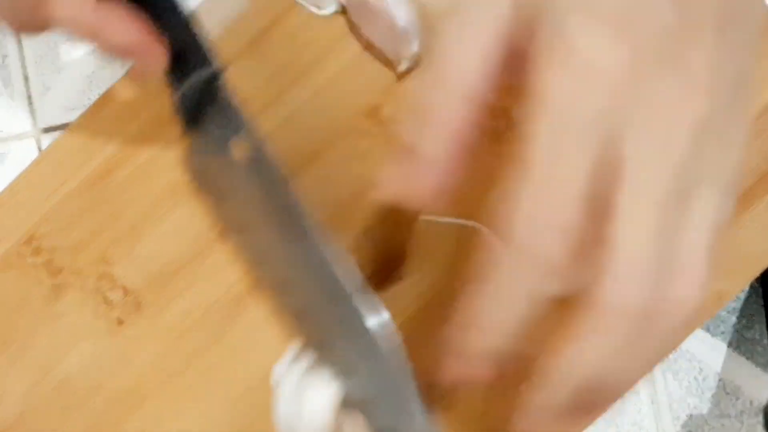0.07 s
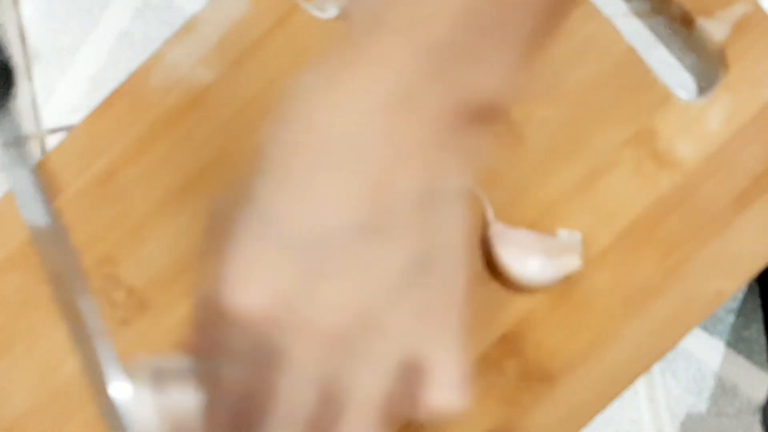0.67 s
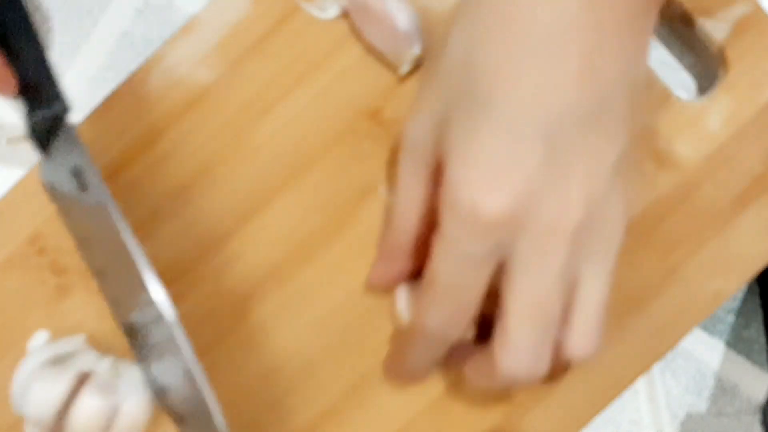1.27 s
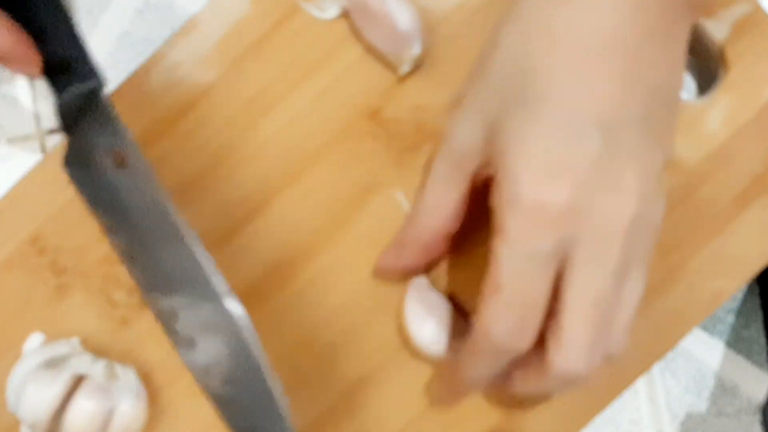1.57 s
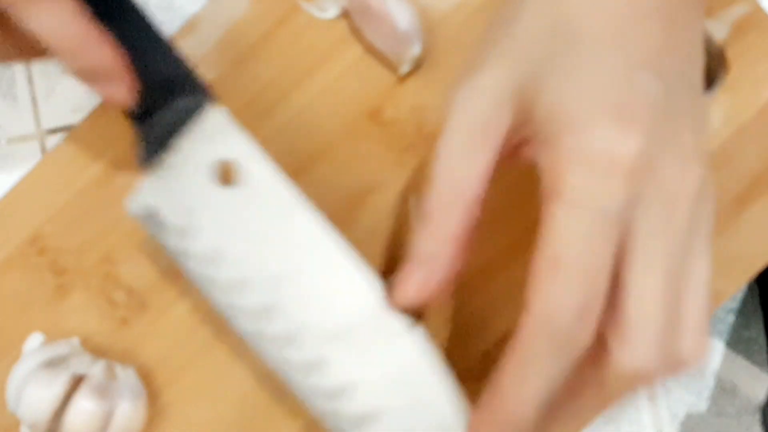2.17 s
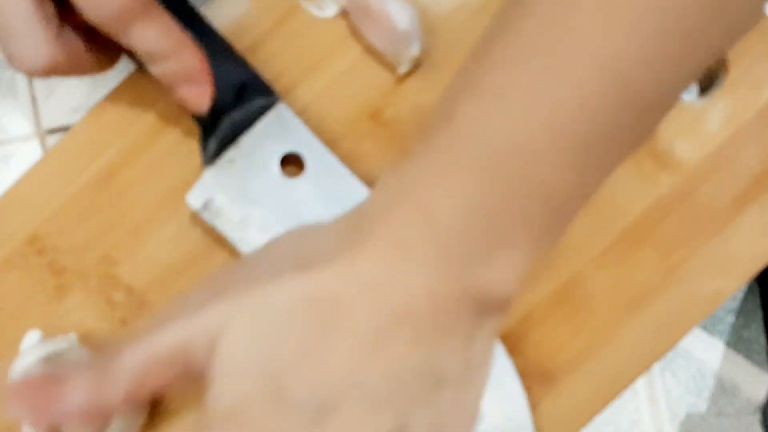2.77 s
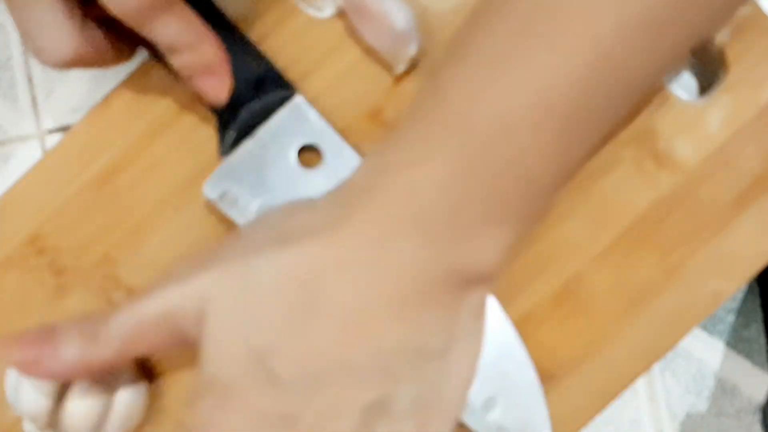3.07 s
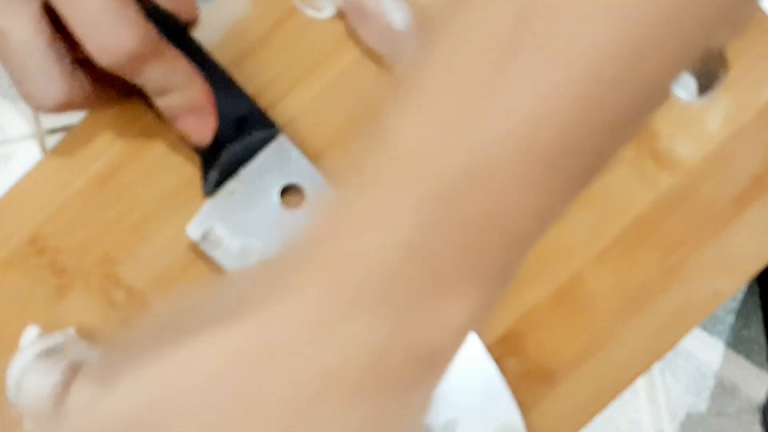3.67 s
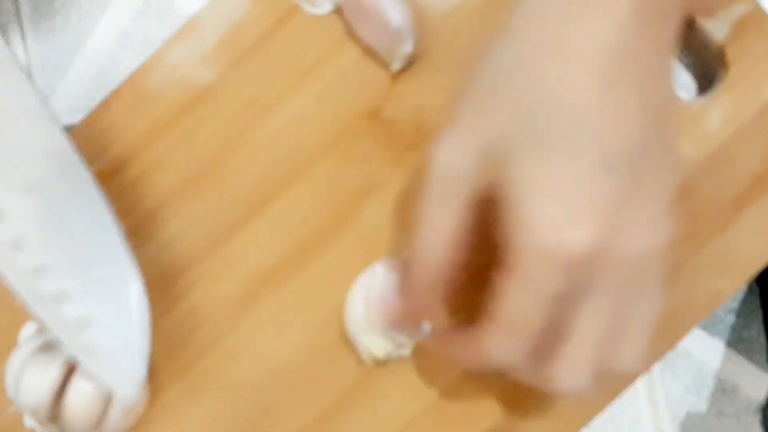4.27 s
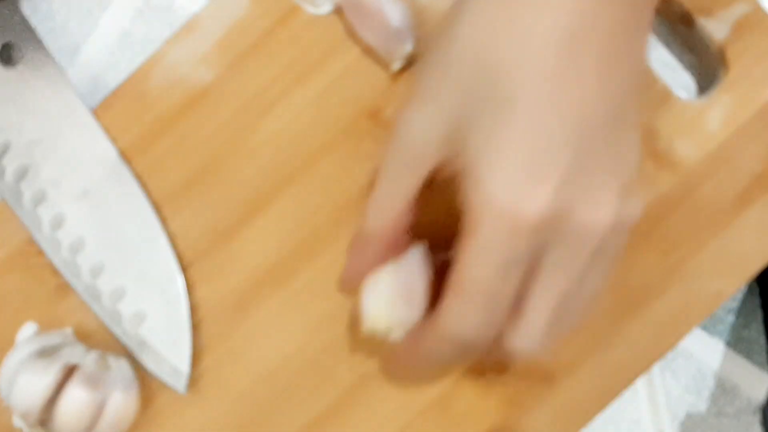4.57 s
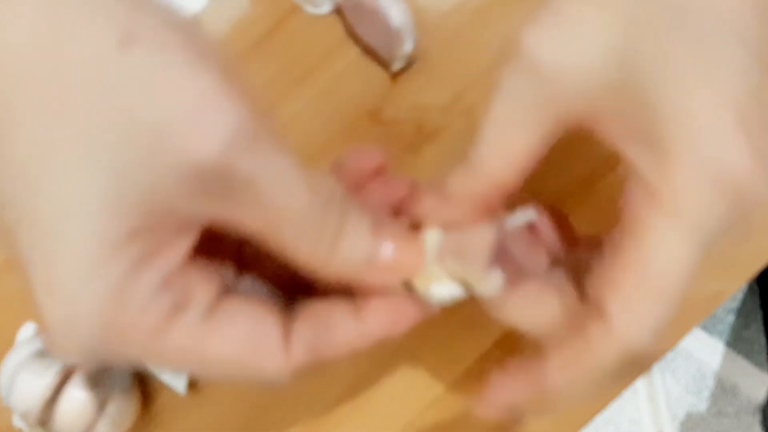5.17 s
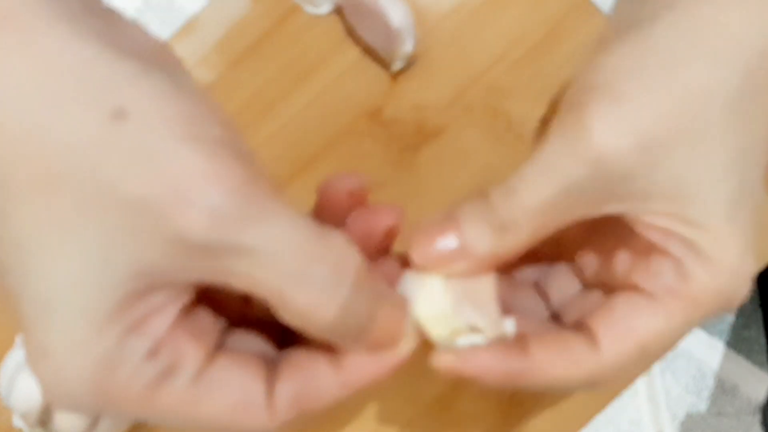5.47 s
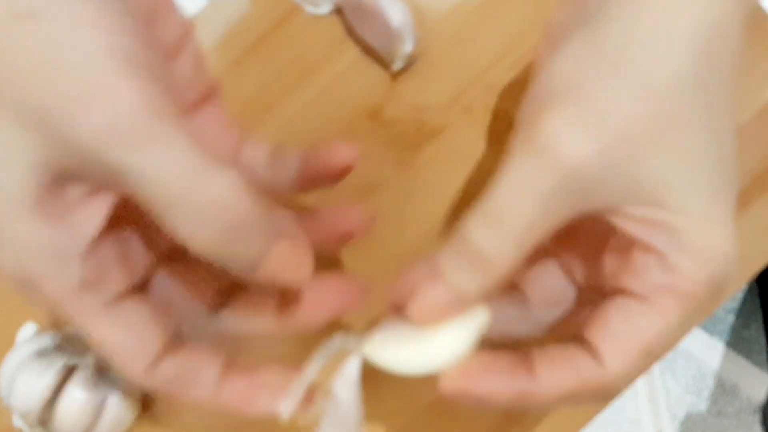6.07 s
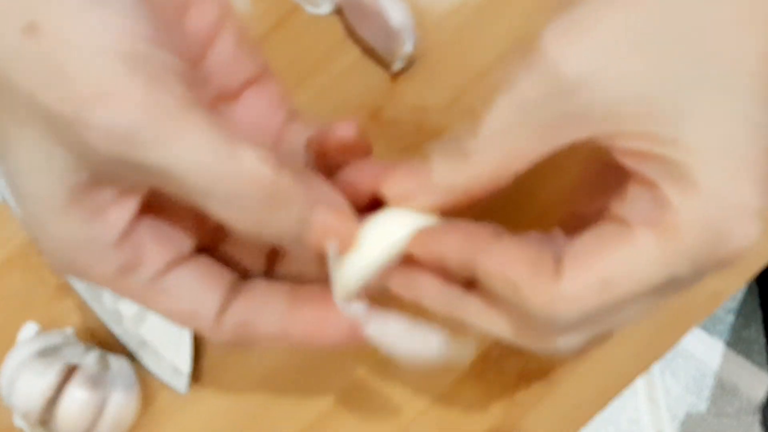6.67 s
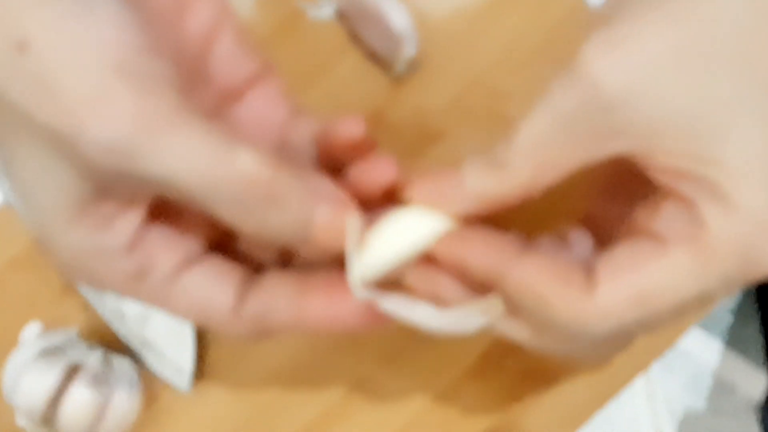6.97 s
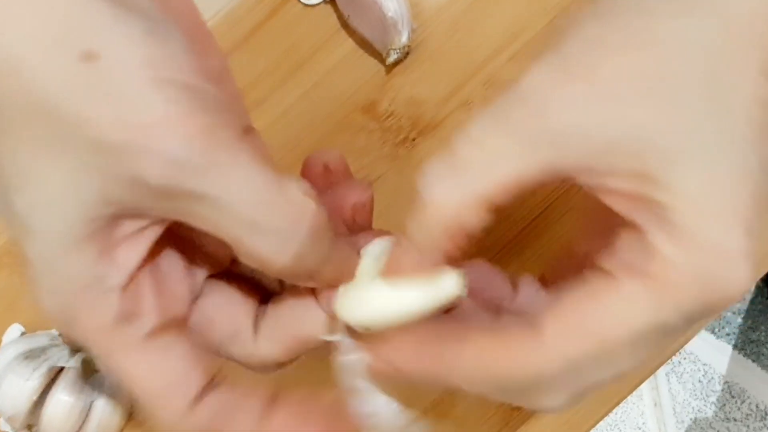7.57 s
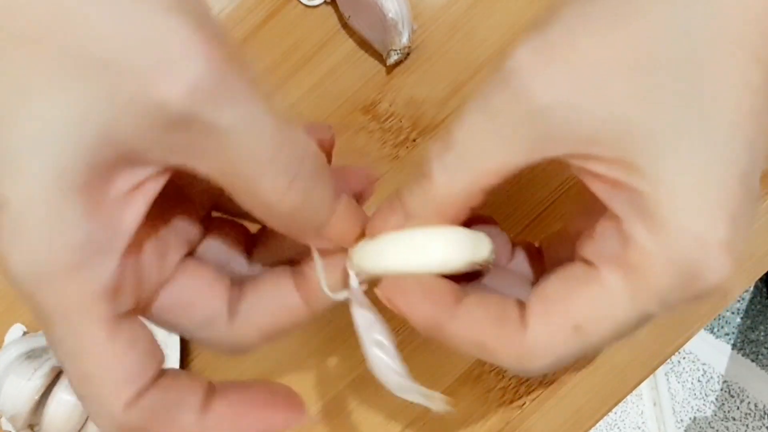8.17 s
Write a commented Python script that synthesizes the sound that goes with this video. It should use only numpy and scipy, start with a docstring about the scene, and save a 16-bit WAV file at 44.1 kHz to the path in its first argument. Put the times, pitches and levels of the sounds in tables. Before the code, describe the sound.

Close steel clacks and board thumps as garlic is crushed under a knife, followed by a clatter and faint, dry peeling.

```python
"""Fingers slide a papery garlic clove over a wooden board and knock on the wood, close to the microphone.
A palm pounds the flat of a knife onto the clove three times: steel clacks, the board thumps, the husk
splinters. The knife clatters down and fingers peel off the crackling skin. The hard-walled kitchen rings
after each blow and hums low; far off, faint tones swell and a small bird chirps outside."""
import sys
import numpy as np
from scipy import signal
from scipy.fft import rfft, irfft, next_fast_len
from scipy.io import wavfile
from scipy.ndimage import map_coordinates

SR = 44100
rng = np.random.default_rng(int(sys.argv[2]) if len(sys.argv) > 2 else 0)


def dump_mix(stems):
    """Bounce the given channels to the path in sys.argv[1] as a 16-bit WAV at rate SR."""
    frames = np.atleast_2d(stems).T  # one column per channel
    limited = np.clip(frames, -1, 1)  # hard clip at full scale
    pcm = np.round(limited * 32767).astype(np.int16)
    wavfile.write(sys.argv[1], SR, pcm)


N = 370881

# spectrum of dry garlic skin: (frequency [Hz], level [dB])
SKIN_SPECTRUM = [(1000, -25), (2000, -10.5), (3300, -6.5), (5400, -2), (8000, -3.5), (11500, 1.5),
                 (15500, -2)]
# the palm pounds the blade onto the clove: (time [s], level [dB], clack centre [Hz], time to give way [s],
# weight behind the landing [dB], husk level [dB], top of the husk's crunch [Hz])
PALM_BLOWS = [(2.599, -3.5, 1261, 0.017, -15.5, -33.5, 14000), (2.967, -2.5, 1226, 0.011, -21.5, -25, 7200),
              (3.683, -6, 839, .002, -13.5, -48, 7000)]


def amp(db):
    """Decibels to gain."""
    return 10 ** (np.asarray(db) / 20)


def unit(x):
    """Scale to rms 1."""
    return x / np.sqrt(np.mean(x ** 2) + 1e-20)


def struck(x):
    """Scale a hit so that its first hundredth of a second has rms 1."""
    return x / np.sqrt(np.mean(x[..., :SR // 100] ** 2) + 1e-20)


def along(points, hz):
    """Read (frequency, value) points on a log frequency axis."""
    freqs, values = np.transpose(points)
    return np.interp(np.log(hz + 1), np.log(freqs + 1), values)


def wobble(rate, size=N):
    """A smooth random curve, rate knots a second."""
    knots = rng.standard_normal(int(size * rate / SR) + 4)
    return map_coordinates(knots, [np.arange(size) * rate / SR])


def colour(x, spectrum):
    """Minimum-phase filter shaped by (frequency [Hz], level [dB]) points."""
    n = x.shape[-1]
    m = 2 * next_fast_len(n // 2 + SR // 10)
    gain = amp(along(spectrum, np.fft.rfftfreq(m, 1 / SR)))
    cepstrum = irfft(np.log(gain))
    cepstrum[1:m // 2] *= 2
    cepstrum[m // 2 + 1:] = 0
    return irfft(rfft(x, m) * np.exp(rfft(cepstrum)), m)[..., :n]


def noise(width, size=N):
    """Stereo white noise; width is the side-to-mid ratio."""
    mid, side = rng.standard_normal((2, size))
    return unit(np.array([mid + width * side, mid - width * side]))


def shaped_noise(spectrum, width, size=N):
    """Stereo noise with the given spectrum, at rms 1."""
    return unit(colour(noise(width, size), spectrum))


def pan(db):
    """Channel gains for a level difference, left minus right."""
    return amp([[db / 2], [-db / 2]])


def add(track, s, sound):
    """Mix a sound into the track at time s."""
    part = track[:, max(round(s * SR), 0):][:, :sound.shape[-1]]
    part += sound[..., :part.shape[1]]


def room_tone(settle_s=1.8, hum_hz=120, swell_s=7.17, swell_width_s=.125):
    """A wavering low drone settles and later swells once into a clean hum, over the microphone's hiss."""
    # spectra of the drone, the rumble under the hum and the hiss: (frequency [Hz], level [dB])
    drone_spectrum = [(20, -28.5), (45, -18.5), (70, -12.5), (95, -6.5), (108, -6.5), (120, 8), (135, -13),
                      (160, -16), (195, -12), (300, -20), (450, -35.5), (1000, -49)]
    rumble_spectrum = [(50, -10), (120, -1), (230, 2), (400, -18), (700, -18.5), (1000, -35), (3000, -80)]
    hiss_spectrum = [(100, -4), (400, -7.5), (1000, -9.5), (2500, -13), (5000, -18.5), (8500, -28),
                     (9300, -5), (9900, -11.5), (10500, 1), (11300, -11.5), (15500, -18)]
    t = np.arange(N) / SR
    drone_db = -69 + 11 * np.exp(-t / settle_s) + 1.1 * wobble(3.9)
    drone = amp(drone_db) * shaped_noise(drone_spectrum, width=.13)
    hum = unit(np.sin(2 * np.pi * hum_hz * t + .3 * wobble(10)))
    rumble = amp(-11.5) * shaped_noise(rumble_spectrum, width=.35)
    swell = amp(-52) * np.exp(-((t - swell_s) / swell_width_s) ** 2)
    hiss = amp(-73.5) * shaped_noise(hiss_spectrum, width=.97)
    return (drone + swell * (hum + rumble)) * pan(-4) + hiss * pan(-2.4)


def crinkle(grain_db, clump_db, size):
    """Papery noise: tiny fractures of very uneven size, coming in clumps."""
    grains = grain_db * np.tanh(wobble(1500, size) / 2)
    clumps = clump_db * np.tanh(wobble(99, size) / 2)
    return unit(colour(noise(.51, size) * amp(grains + clumps), SKIN_SPECTRUM))


def stroke(length, skin_db, rub_db, grain_db, flakes_per_s=20):
    """A stroke swells and stops: skin hisses and sheds crackling flakes over a dull rub."""
    # rubbing on wood: (frequency [Hz], level [dB])
    rub_spectrum = [(400, -15), (800, -9.5), (1250, 2.5), (1700, -12), (2200, -16), (3500, -17),
                    (6000, -17)]
    size = int(length * SR)
    paper = crinkle(grain_db, clump_db=.5 * grain_db, size=size)
    t = np.arange(SR // 100) / SR
    flakes = np.zeros((2, size))
    for place, smallness in rng.random((int(flakes_per_s * length), 2)):
        flake_db = 2.5 - 4.5 * np.log(smallness + .1)
        add(flakes, place * length, amp(flake_db - 60 * t / .006) * noise(1, len(t)))
    skin = amp(skin_db) * (paper + colour(flakes, SKIN_SPECTRUM))
    rub = amp(rub_db) * shaped_noise(rub_spectrum, width=.77, size=size)
    return signal.windows.tukey(size, .5) * (skin + rub)


def finger_strokes():
    """Sliding on the board is smooth and rubs the wood; pulling the skin is grainy and dry."""
    # the clove slides over the board: (time [s], length [s], skin level [dB], rub level [dB])
    slides = [(0.037, 0.096, -61, -65), (0.203, 0.12, -58, -68), (0.487, 0.27, -60, -61),
              (0.965, 0.13, -63.5, -66), (1.064, 0.21, -53.5, -63.5), (1.724, 0.15, -84, -65)]
    # fingers pull at the skin: (time [s], length [s], skin level [dB])
    pulls = [(5.057, .1, -72), (5.406, 0.046, -60), (5.582, 0.14, -49.5), (5.898, 0.031, -56),
             (7.332, 0.25, -65.5), (8.305, 0.15, -79)]
    out = np.zeros((2, N))
    for s, length, skin_db, rub_db in slides:
        add(out, s, stroke(length, skin_db, rub_db, grain_db=5) * pan(-1.67))
    for s, length, skin_db in pulls:
        add(out, s, stroke(length, skin_db, rub_db=skin_db - 27, grain_db=12) * pan(.23))
    return out


def burst(t, spectrum, t60, width):
    """A short crack of coloured noise."""
    return struck(colour(noise(width, len(t)) * amp(-60 * t / t60), spectrum))


def skin_snaps():
    """Single flakes of skin break with a bright tick, right of centre; thick ones also pop."""
    # dry skin breaking: (time [s], level [dB], pop offset [dB])
    breaks = [(0.049, -45.5, -2.5), (0.1397, -37, -31), (0.834, -37, -56), (1.001, -51.5, 2),
              (2.2343, -31, -15), (5.582, -41, -43), (5.6062, -38, -39), (5.9046, -50, -10),
              (7.0341, -42.5, -12), (7.1177, -41, -25), (7.4849, -29.5, -25.5), (7.5807, -41.5, 0),
              (7.8248, -44, -34), (7.973, -37, -13)]
    # spectra of the bright tick and the dull pop: (frequency [Hz], level [dB])
    tick_spectrum = [(1200, -74), (3000, -19), (5000, -1), (8000, -6.5), (11500, 10), (15500, -2.5)]
    pop_spectrum = [(900, -17), (1250, -8.5), (1500, 3.5), (1800, -8), (2100, 1), (3000, -12),
                    (6000, -14.5)]
    out = np.zeros((2, N))
    t = np.arange(SR // 10) / SR
    for s, db, pop_db in breaks:
        tick = amp(-17.5) * burst(t, tick_spectrum, t60=.014, width=.75) * pan(-5)
        pop = amp(pop_db - 10) * burst(t, pop_spectrum, t60=.06, width=1) * pan(1)
        add(out, s, amp(db) * (tick + pop))
    return out


def ring(modes, t, attack, detune, scatter_db, spread):
    """Damped modes, weighted and detuned anew by each contact; each reaches one channel a little early."""
    out = np.zeros((2, len(t)))
    for k, (hz, db, t60) in enumerate(modes):
        pitch, gain, side = rng.standard_normal(3)
        lead = np.clip(spread * side, -np.pi / 4, np.pi / 4) * np.array([[1], [-1]])
        phase = 2 * np.pi * hz * (1 + detune * pitch) * t + lead
        out += (-1) ** k * amp(db + scatter_db * gain - 60 * t / t60) * np.sin(phase)
    return struck(out * (1 - np.exp(-t / attack)))


def contact(db, centre_hz, weight_db, crack_db):
    """Steel clacks on wood at once; the board's low bounce swells a moment later and the room answers."""
    # modes: (frequency [Hz], level [dB], t60 [s])
    clack_modes = [(815, -6, 0.015), (1051.8, 0, 0.017), (1183.5, 0.5, 0.033), (1313, 1, .022),
                   (1519, 0, 0.035), (1676, -2, 0.02), (1990, -1, 0.032)]  # steel on wood
    blade_modes = [(2046, -3, 0.019), (2575, -2, 0.02), (2888, -5.5, 0.019), (3198, -10.5, 0.018),
                   (3710, -5, 0.0082), (4580, -7.5, 0.0052)]  # the hand-damped blade
    bend_modes = [(255, -13, 0.06), (314.5, -13, .14), (390, -6.5, 0.035), (489, -13, 0.09),
                  (566.4, -12.5, .1), (645, -6.5, .045), (808, 1, 0.015)]  # the board bending
    bounce_modes = [(54, -23, 0.26), (75.5, -17.5, 0.28), (87.8, -10.5, .42), (143, -5.5, 0.33),
                    (162.86, -1, 0.33), (220.3, -9, 0.17)]  # the board bouncing on the table
    # the sharp crack of impact: (frequency [Hz], level [dB])
    crack_spectrum = [(2500, -21.5), (4200, 2), (5200, 4), (7100, 1), (8300, -6), (11000, -8.5),
                      (15500, -18.5)]
    t = np.arange(SR // 2) / SR
    short = t[:SR // 10]
    # the place and hardness of the contact favour the modes near its centre
    favoured = [(hz, level - 16 * np.log2(hz / centre_hz) ** 2, t60) for hz, level, t60 in clack_modes]
    clack = ring(favoured, short, attack=.001, detune=.018, scatter_db=2, spread=.93)
    blade = ring(blade_modes, short, attack=.0003, detune=.025, scatter_db=4.5, spread=.88)
    crack = struck(burst(short, crack_spectrum, t60=.018, width=2.2) * (1 - np.exp(-short / .0025)))
    bend = ring(bend_modes, t, attack=.0018, detune=.02, scatter_db=3.5, spread=.55)
    bounce = ring(bounce_modes, t, attack=.0094, detune=.012, scatter_db=1.5, spread=.2)
    blade_db = -12.5 + .68 * db  # a harder contact wakes the blade more
    bend_db = -6.5 + .72 * weight_db  # a heavier one bends the board more
    hit = np.zeros((2, SR * 3 // 4))
    add(hit, 0, amp(-12.5) * clack + amp(blade_db) * blade + amp(crack_db) * crack)
    add(hit, 0, amp(bend_db) * bend + amp(weight_db - 7.5) * bounce)
    return amp(db) * (hit + amp(-5.5) * kitchen(hit))


def board_blows():
    """Dull knocks, steel clatter, and palm blows that strike twice: on the clove, then through it."""
    # fingers and the held knife knock the board: (time [s], level [dB], clack centre [Hz], weight [dB])
    knocks = [(0.092, -59, 700, 12), (0.239, -34.5, 800, -12), (0.401, -38.5, 1100, -17),
              (1.071, -21.5, 1270, -17.5), (2.235, -32, 940, -11.5), (2.247, -24, 1000, -17.5),
              (2.302, -36, 926, -9), (3.172, -38, 900, -13), (3.656, -22, 1050, -11),
              (3.852, -22, 1250, -18.5), (4.241, -57.5, 700, 7)]
    # bare steel taps, then clatters down: (time [s], level [dB], clack centre [Hz], relative crack [dB])
    clatter = [(3.52, -6.5, 1048, -31.5), (4.305, -5.5, 1480, -28.5), (4.317, -13, 1515, -43.5),
               (4.323, -12, 1450, -40), (4.373, -4.5, 1380, -25.5), (4.391, -5.5, 2483, -20.5),
               (4.412, -9, 2086, -36.5)]
    out = np.zeros((2, N))
    for s, db, centre_hz, weight_db in knocks:
        add(out, s, contact(db, centre_hz, weight_db, crack_db=-36.5) * pan(-1.5))
    for s, db, centre_hz, crack_db in clatter:  # only the knife's own weight is behind these
        add(out, s, contact(db, centre_hz, weight_db=-39, crack_db=crack_db) * pan(-3))
    for s, db, centre_hz, give_s, weight_db, *_ in PALM_BLOWS:
        add(out, s, contact(db, centre_hz, weight_db=-32.5, crack_db=-23) * pan(-2.4))
        add(out, s + give_s, contact(db - 5, centre_hz, weight_db, crack_db=-30.5) * pan(-1.1))
    return out


def far_tones():
    """Blurred tones swell and fade in the distance."""
    # narrow bands of noise: (time [s], length [s], frequency [Hz], level [dB])
    tones = [(0.099, 0.37, 818, -59.5), (1.243, 0.27, 1720, -71.5), (1.519, 0.26, 1336, -66),
             (1.92, 0.31, 665, -73), (6.423, 0.29, 1135, -69)]
    out = np.zeros((2, N))
    for s, length, hz, db in tones:
        swell = np.hanning(int(length * SR))
        band = [(hz * .8, -50), (hz * .98, -8), (hz, 0), (hz * 1.02, -8), (hz * 1.15, -50)]
        add(out, s, amp(db - 4) * swell * shaped_noise(band, width=.78, size=len(swell)))
    return out


def bird(note_s=.02, spacing_s=.034, start_hz=5550, end_hz=4400):
    """A small bird outside sings runs of quick downward whistles that start soft and grow."""
    # its phrases: (time [s], notes [count], level approached [dB])
    phrases = [(2.459, 3, -68), (6.288, 4, -60), (6.577, 3, -58), (6.864, 3, -57.5)]
    out = np.zeros((2, N))
    progress = np.linspace(0, 1, int(note_s * SR))
    hz = start_hz + (end_hz - start_hz) * progress
    for s, count, db in phrases:
        for k in range(round(count)):
            phase = 2 * np.pi * np.cumsum(hz) / SR + .36 * wobble(700, len(hz))
            envelope = np.sin(np.pi * progress) * amp(3 * wobble(200, len(hz)))
            note_db = db - 16 * .3 ** k
            add(out, s + k * spacing_s, amp(note_db) * envelope * np.sin(phase))
    return out


def husk_crush(splinter_s=.064, air_t60=.63):
    """The husk splinters, duller once it is broken, and the palm pushes air at the microphone."""
    air_spectrum = [(20, -21), (52, 1.5), (90, -3.5), (300, -49)]  # (frequency [Hz], level [dB])
    out = np.zeros((2, N))
    t = np.arange(SR // 3) / SR
    for s, *_, husk_db, top_hz in PALM_BLOWS:
        fractures = crinkle(grain_db=10.5, clump_db=-1, size=len(t))
        husk = colour(fractures, [(top_hz, 0), (2 * top_hz, -11)])
        add(out, s, amp(husk_db) * np.exp(-(t / splinter_s) ** 2) * husk * pan(-1.8))
        air = shaped_noise(air_spectrum, width=.51, size=len(t))
        puff = amp(husk_db - 6.5 - 60 * t / air_t60) * (1 - np.exp(-t / .008))
        add(out, s, puff * air * pan(-10.5))
    return out


def kitchen(x, gap_s=.003, early_db=10, early_t60=.38):
    """Near surfaces answer densely and die fast; the room's tail lingers behind them."""
    # the room's decay: (frequency [Hz], t60 [s])
    decay_times = [(150, 0.9), (500, .72), (1200, 0.36), (2600, 0.29), (5000, 0.46), (9000, 0.3),
                   (15000, 0.95)]
    # the share that the hard walls reflect: (frequency [Hz], level [dB])
    wall_spectrum = [(80, -18), (200, -2.5), (450, 2.5), (1200, -4), (2600, 4), (6000, 1), (15000, -3)]
    hz, t, bands = signal.stft(rng.standard_normal((2, SR * 3 // 4)), SR, nperseg=256)
    early = amp(early_db - 60 * t / early_t60)
    late = amp(-60 * t / along(decay_times, hz)[:, None])
    tail = signal.istft(bands * (early + late), SR, nperseg=256)[1]
    tail = tail * np.clip(np.arange(tail.shape[1]) / SR / gap_s - .5, 0, 1)
    tail = tail + .35 * tail[::-1]  # both channels share part of each reflection
    tail = colour(tail / np.linalg.norm(tail[0]), wall_spectrum)
    return signal.fftconvolve(x, tail, axes=1)[:, :x.shape[1]]


def scene():
    """Board and hands sound close up into the room; the bird's notes arrive with a little echo."""
    skin = husk_crush() + skin_snaps() + finger_strokes()
    song = bird()
    blows = board_blows()
    reflections = kitchen(amp(-5) * skin + amp(-3.5) * song)
    return blows + skin + song + reflections + far_tones() + room_tone()


def record(dry):
    """The microphone thins the deepest bass and keeps nothing above its band limit."""
    bass_hz, top_hz = 22, 15800
    m = next_fast_len(N + SR // 2)
    hz = np.fft.rfftfreq(m, 1 / SR)
    bass_cut = (1j * hz / (1j * hz + bass_hz)) ** 3
    band_limit = np.clip((top_hz - hz) / 400 + .5, 0, 1)
    return irfft(rfft(dry, m) * bass_cut * band_limit, m)[:, :N]


dry = scene()
out = record(dry)
dump_mix(out)
```